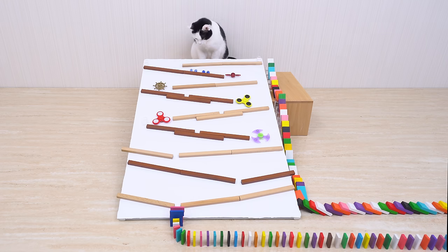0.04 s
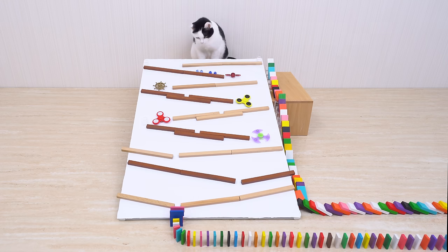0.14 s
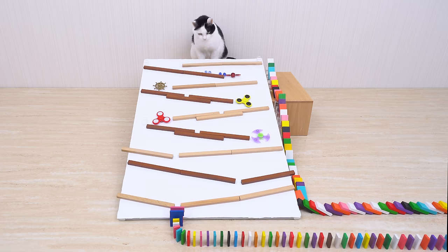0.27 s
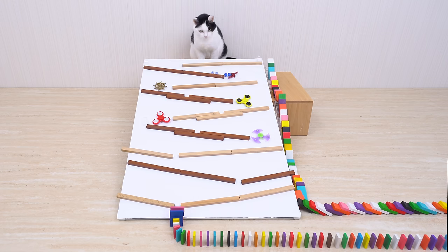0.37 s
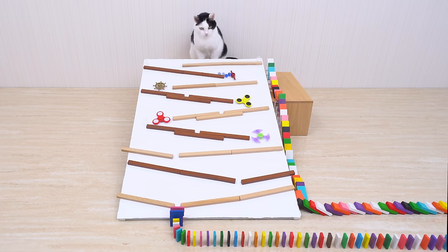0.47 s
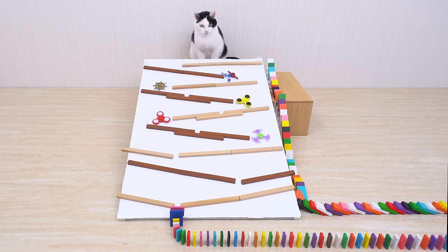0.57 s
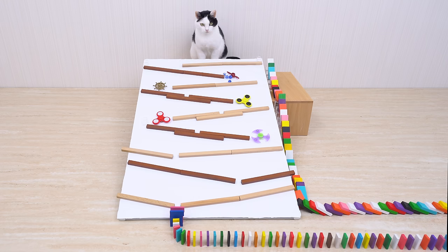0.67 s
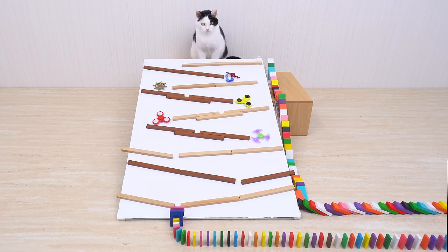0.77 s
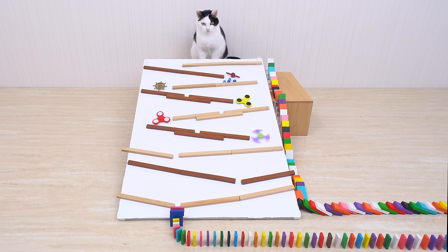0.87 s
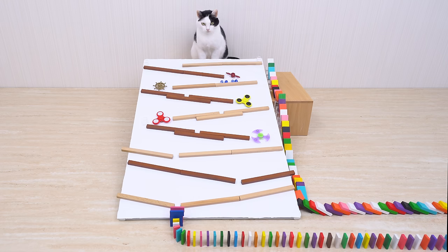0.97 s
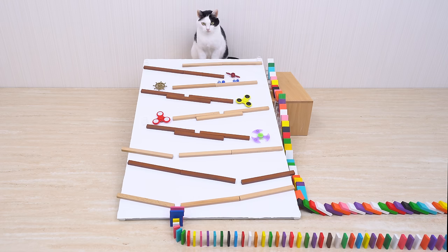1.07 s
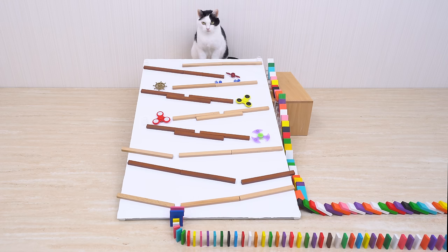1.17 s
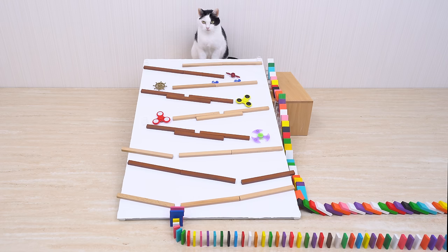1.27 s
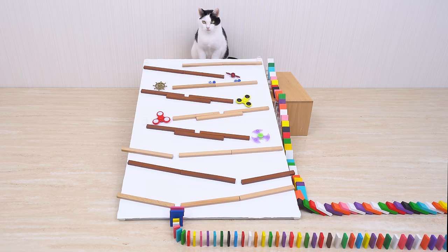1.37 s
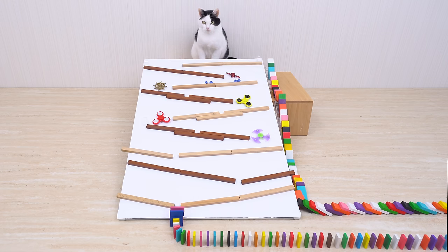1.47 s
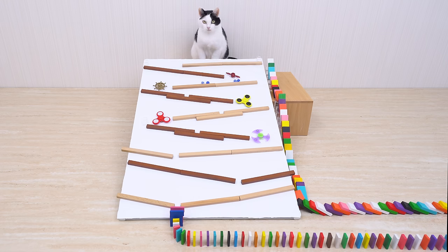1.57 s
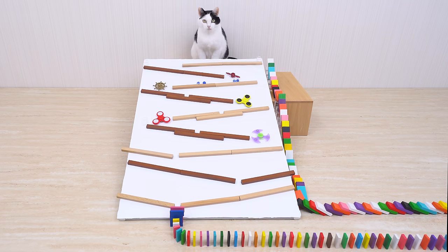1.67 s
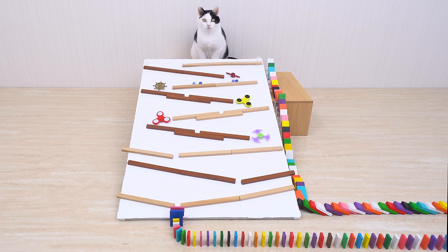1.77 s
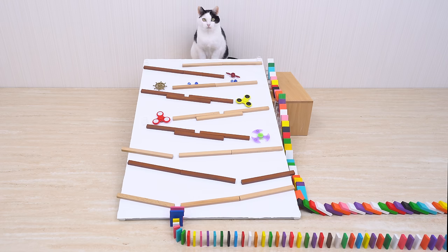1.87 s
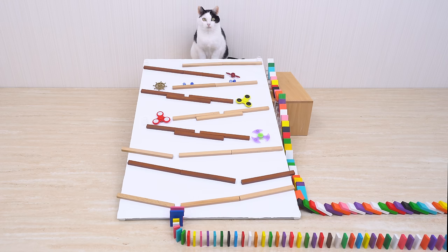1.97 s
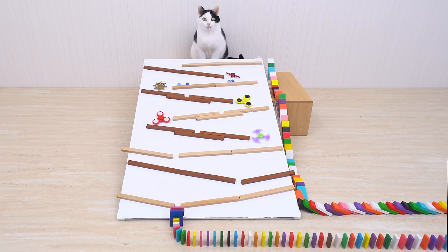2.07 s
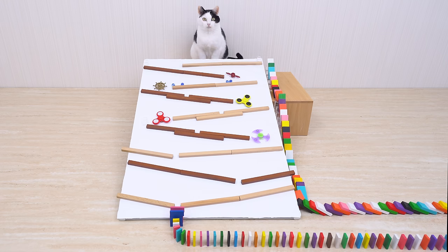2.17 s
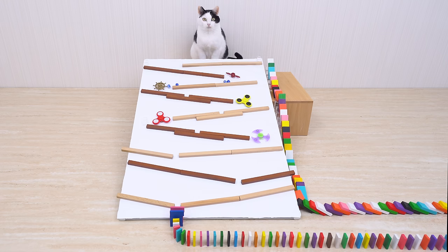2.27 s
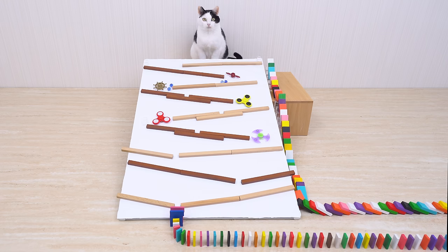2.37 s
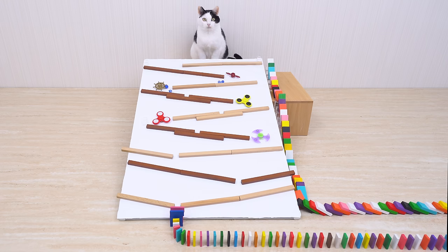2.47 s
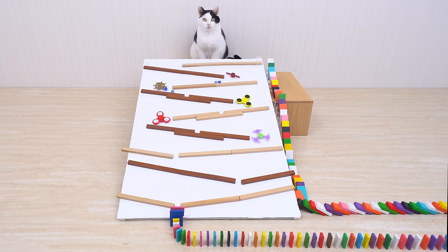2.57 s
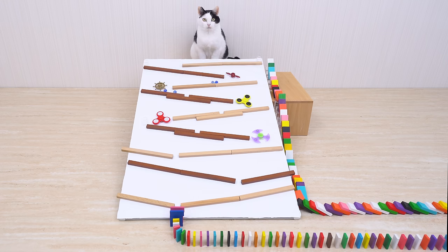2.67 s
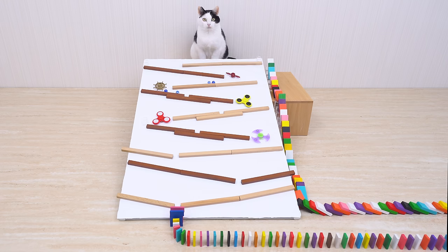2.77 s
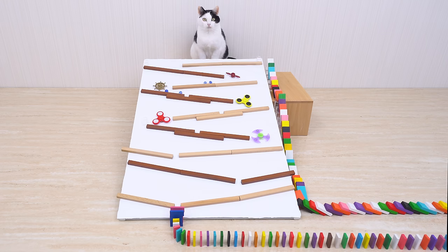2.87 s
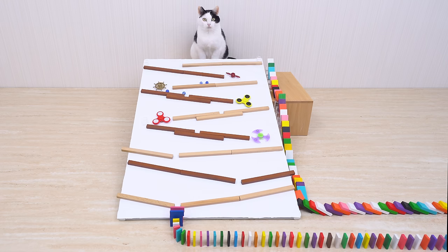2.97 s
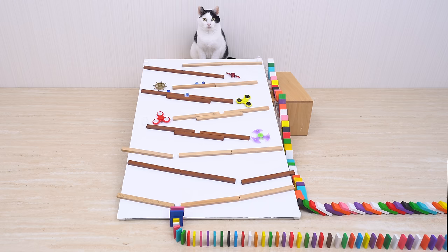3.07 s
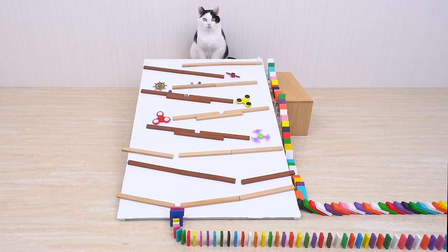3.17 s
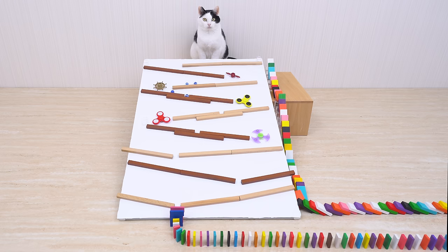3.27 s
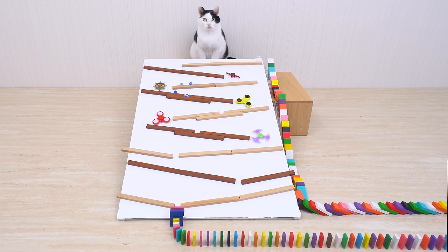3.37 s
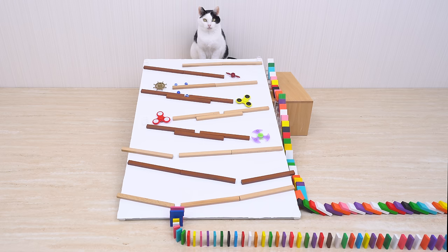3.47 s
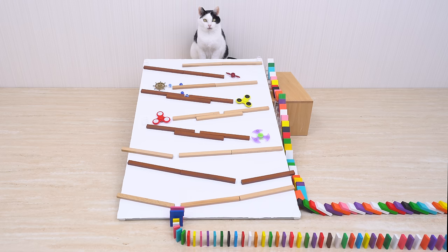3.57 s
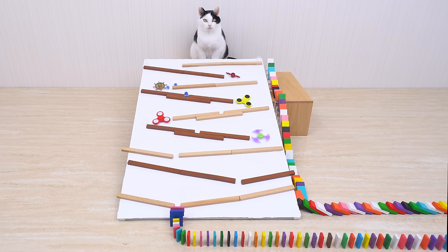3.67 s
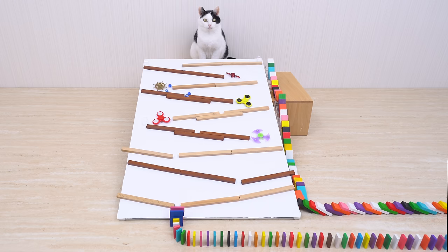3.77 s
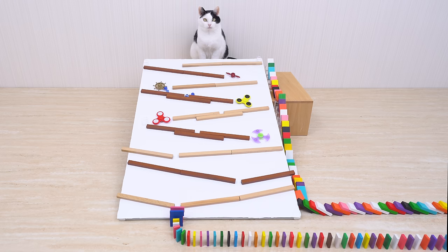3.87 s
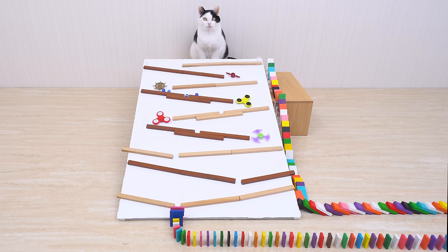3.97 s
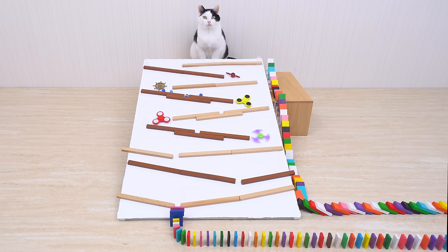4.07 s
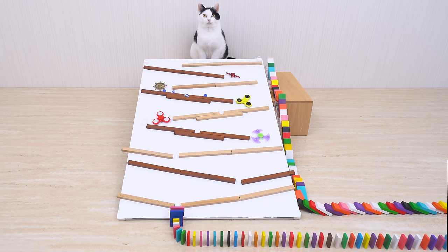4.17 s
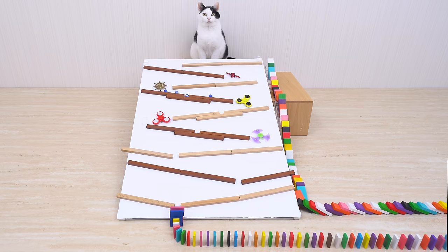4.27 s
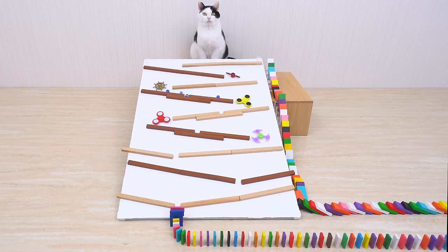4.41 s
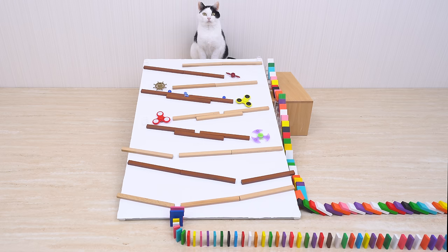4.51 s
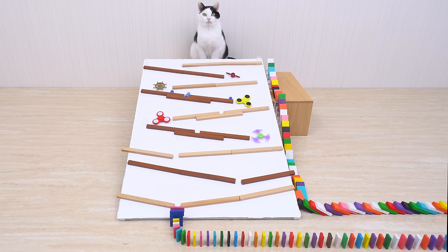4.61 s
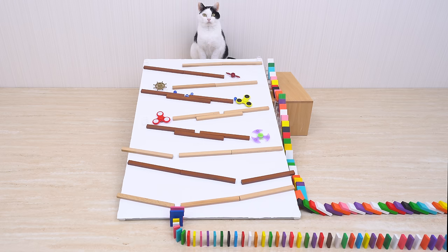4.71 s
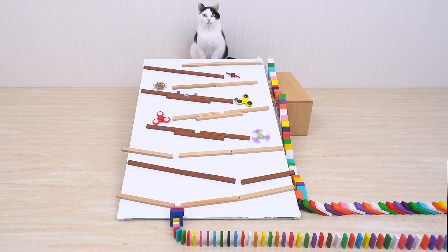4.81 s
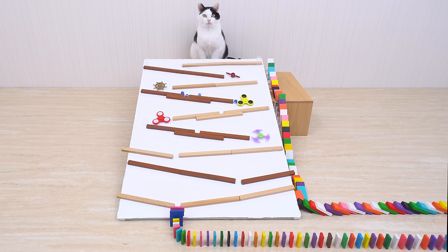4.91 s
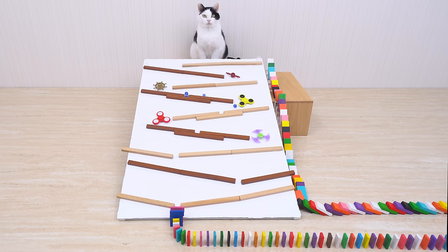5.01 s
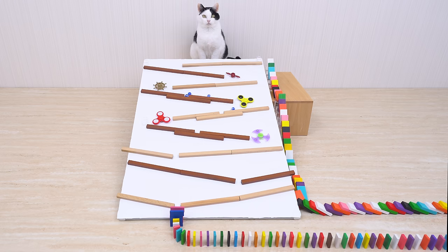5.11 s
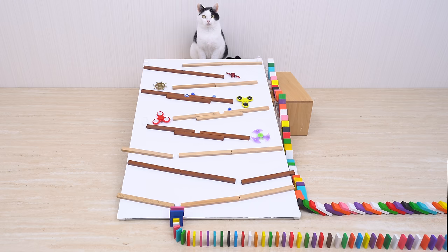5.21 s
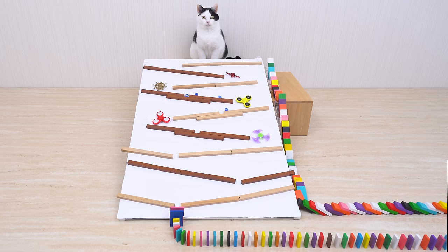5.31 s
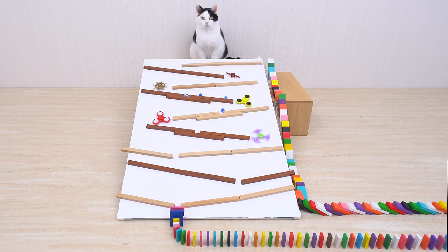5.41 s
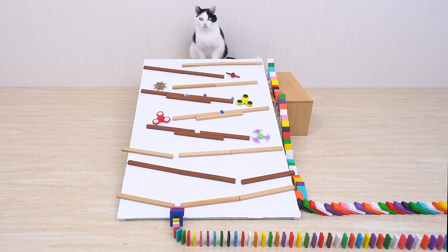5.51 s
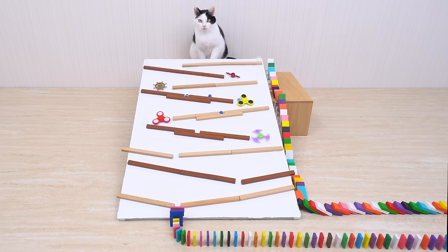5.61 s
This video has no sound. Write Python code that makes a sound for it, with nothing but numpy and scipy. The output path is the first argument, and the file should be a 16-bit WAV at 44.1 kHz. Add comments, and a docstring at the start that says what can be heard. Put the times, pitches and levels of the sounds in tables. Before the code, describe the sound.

Dry, bright marble knocks scatter over wood in uneven bursts, some with short metal spinner rings, in a quiet bare room.

```python
"""Marbles on a wooden run

Glass marbles roll along wooden rails on a sloping board, drop from rail to rail and bump two metal spinners.
Each knock is a clack of rail modes, a hard tick of filtered contact noise and a thud of board modes.
Rolling is a rain of small bumps on the board; the spinners ring as dying sines.
The microphone also hears a bare room, as a floor bounce, a wall slap and a tail, over quiet air noise."""
import sys
import numpy as np
from scipy import signal
from scipy.fft import rfft, irfft
from scipy.io import wavfile

SR = 44100
rng = np.random.default_rng(int(sys.argv[2]) if len(sys.argv) > 2 else 0)


def dump_mix(stems):
    """Bounce the given channels to the path in sys.argv[1] as a 16-bit WAV at rate SR."""
    frames = np.atleast_2d(stems).T  # one column per channel
    limited = np.clip(frames, -1, 1)  # hard clip at full scale
    pcm = np.round(limited * 32767).astype(np.int16)
    wavfile.write(sys.argv[1], SR, pcm)


def magnitude_from_level(level_db):
    """Linear magnitude for a level in decibels (20 dB per decade)."""
    exponent = np.asarray(level_db, float) / 20
    return 10 ** exponent


N = 249165

# modes of the wooden board: pitch_hz, width_hz, top_edge_push_db, lower_push_db (relative levels)
BOARD_MODES = [(261.5, 36.7, 2.5, -4.5), (294.2, 62, 5.5, -3.5), (343, 50, 3, -5), (406.4, 42, 9, 2.5),
               (445.4, 32.3, 9, -1.5), (493.8, 25, 8.5, -3.5), (571.3, 30, 10, -3), (693, 45, 1.5, -2.5),
               (808.3, 56, 4, -0.5), (993, 37, -3.5, -10), (1190, 130, 0, -10)]
LOWER_FROM_S = 1.7  # from here the marbles are on the lower rails
LOOSE_T60_S = 0.009  # decay of a loose rail's note


def evened(x):
    """Scales to rms 1."""
    return x / np.sqrt(np.mean(x ** 2) + 1e-20)


def read(hz, at_hz, value):
    """Straight lines on a log-frequency axis."""
    return np.interp(np.log(hz + 1), np.log(np.asarray(at_hz) + 1), value)


def add(mix, s, sound):
    """Mixes a sound in at time s."""
    part = mix[round(s * SR):][:len(sound)]
    part += sound[:len(part)]


def highpass(x, order, hz):
    """Butterworth filter that takes away the lows."""
    return signal.lfilter(*signal.butter(order, hz, "high", fs=SR), x)


def lowpass(x, order, hz):
    """Butterworth filter that takes away the highs."""
    return signal.lfilter(*signal.butter(order, hz, fs=SR), x)


def hiss(points):
    """Noise of rms 1 whose spectrum follows the given (Hz, relative dB) points."""
    hz = np.fft.rfftfreq(N, 1 / SR)
    spectrum = rfft(rng.standard_normal(N)) * magnitude_from_level(read(hz, *np.transpose(points)))
    return evened(irfft(spectrum, N))


def ring(hz, t60, length=.4):
    """One dying mode: a sine that falls 60 dB in t60 seconds."""
    t = np.arange(round(length * SR)) / SR
    return magnitude_from_level(-60 * t / t60) * np.sin(2 * np.pi * hz * t)


def board(low, spread=0):
    """The board's answer, peak 1, to a push high or low on it; spread is a dB change of each mode."""
    hz, width, top_db, low_db = np.transpose(BOARD_MODES)
    sign = (-1) ** np.arange(len(hz))  # neighbouring modes swing in opposite senses
    level = sign * magnitude_from_level((low_db if low else top_db) + spread)
    # a resonance of width w Hz dies by 60 dB in 2.2 / w seconds
    modes = sum(a * ring(f, 2.2 / w) for f, w, a in zip(hz, width, level))
    return modes / abs(modes).max()


def air():
    """Quiet steady air noise beneath everything, as filtered noise."""
    # spectrum of the air noise: frequency_hz, relative_level_db
    air_spectrum = [(12, -28.5), (20, -23), (146, -10.5), (244, -10), (311, -8.5), (386, -2.5), (491, -5.5),
                    (912, -12), (1440, -21), (3230, -38), (7850, -38.5), (9480, -38.5), (12400, -40),
                    (16100, -61), (22000, -120)]
    return magnitude_from_level(-68) * hiss(air_spectrum)


def room(x):
    """Single echoes, then sparse taps whose bands die at their own speed; three tails take turns."""
    # early reflections from floor and walls: delay_s, level_db
    reflections = [(.0009, -6), (.0033, -10), (0.0127, -4), (0.018, -18.5), (0.034, -12)]
    # tail of the bare room by band: frequency_hz, t60_s, relative_level_db
    tail_bands = [(205, 0.36, -8.5), (742, 0.47, 3), (2315, 0.5, 0), (4167, 0.47, 5.5), (8320, 0.38, 0.5),
                  (16000, 0.27, -0.5)]
    out = x.copy()
    dull = lowpass(x, 2, 9000)  # walls and floor scatter the treble
    for s, db in reflections:
        add(out, s, magnitude_from_level(db) * dull)
    at_hz, t60, db = np.transpose(tail_bands)
    turn = np.pi * 2.3 * np.arange(N) / SR
    for k in range(3):
        taps = np.zeros(SR)
        at = np.arange(200, SR - 20, 20)
        taps[at + rng.integers(0, 20, len(at))] = rng.choice([-1., 1.], len(at))
        hz, t, z = signal.stft(taps, SR, nperseg=128)
        rise = 1 - .8 * np.exp(-(t / .016) ** 2)  # sound needs time to come back from the walls
        band_db = read(hz, at_hz, db)[:, None]
        fall_db = 60 * t / read(hz, at_hz, t60)[:, None]
        tail = signal.istft(z * rise * magnitude_from_level(band_db - fall_db), SR, nperseg=128)[1]
        tail = tail / np.linalg.norm(tail)
        share = np.sqrt(2 / 3) * np.cos(turn + k * np.pi / 3)  # the squared shares add up to 1
        out += magnitude_from_level(-1.5) * signal.oaconvolve(share * x, tail)[:N]
    return out


def rolling():
    """Small bumps under the marbles shake the board and scratch faintly."""
    # marbles rolling along the rails: time_s, rumble_db
    rumble_levels = [(0.0, -54.5), (0.39, -65.5), (0.53, -54), (1.2, -87), (1.62, -84), (1.8, -93),
                     (1.95, -78.5), (2.2, -77), (2.34, -68.5), (2.49, -80), (2.9, -66.5), (2.98, -80),
                     (3.14, -72), (3.74, -65.5), (4.2, -106), (4.39, -80), (5.07, -81.5), (5.55, -102)]
    # grit under the glass: frequency_hz, relative_level_db
    grit_spectrum = [(880, -13.5), (1500, -0.5), (2920, -5.5), (4410, -12), (5370, -29.5), (8000, -23),
                     (10400, -51.5), (17600, -120)]
    bumps_per_s, scratch_db = 400, -15.5  # scratch is relative to the rumble
    t = np.arange(N) / SR
    level = magnitude_from_level(np.interp(t, *np.transpose(rumble_levels)))
    strength = magnitude_from_level(3 * np.minimum(rng.exponential(1, N), 3)) * rng.standard_normal(N)
    bumps = strength * (rng.random(N) < bumps_per_s / SR)
    bumps = lowpass(bumps, 1, 610)  # rolling bumps are soft and reach the high board modes less
    rumble = np.zeros(N)
    for low in (False, True):
        here = bumps * ((t > LOWER_FROM_S) == low)
        rumble += signal.oaconvolve(here, board(low))[:N]
    return level * (evened(rumble) + magnitude_from_level(scratch_db) * hiss(grit_spectrum))


def lurches():
    """A marble lurches over a rough spot: a soft push that favours the low board modes."""
    # soft pushes on the board: start_s, peak_db
    soft_pushes = [(0.004, -55.5), (0.128, -69), (0.286, -46), (0.408, -48), (1.994, -49.5), (2.024, -51),
                   (2.109, -53), (2.173, -52), (2.277, -53), (2.329, -59), (2.79, -44.5), (3.463, -45.5),
                   (3.486, -59.5), (3.597, -51), (3.651, -55), (4.966, -53)]
    out, t = np.zeros(N), np.arange(400) / SR
    push = t * np.exp(-t / .0003)  # strongest after 0.3 ms
    for s, db in soft_pushes:
        hum = np.convolve(board(s > LOWER_FROM_S), push)
        add(out, s, magnitude_from_level(db) * hum / abs(hum).max())
    return out


def spinner(modes, strikes):
    """Each strike excites the three families of metal modes by its own amounts."""
    out = np.zeros(N)
    for s, *family_db in strikes:
        bell = sum(magnitude_from_level(family_db[int(family)] + db) * ring(hz, t60) for hz, t60, family, db in modes)
        t = np.arange(len(bell)) / SR
        swell = 1 - np.exp(-t / .004)  # the arms take up the blow over a few ms
        add(out, s, bell * swell)
    return out


def spinners():
    """Two small metal spinners, one high and one low on the board, ring when marbles bump them."""
    # modes of each spinner: pitch_hz, t60_s, family (0-2), level_in_family_db
    upper_modes = [(4231, .08, 0, 0), (7905, .1, 1, 0), (8158, .13, 1, -3), (15110, .07, 2, 0),
                   (15520, .12, 2, -6)]
    lower_modes = [(8480, .09, 0, 0), (11080, .05, 1, 0), (14930, .05, 2, 0)]
    # strikes on each spinner: start_s, family_0_db, family_1_db, family_2_db
    upper_hits = [(0.3378, -73.5, -48.5, -36), (0.36, -49.5, -42.5, -55), (0.4254, -67, -40.5, -62),
                  (0.4499, -52, -44, -38.5), (0.5616, -57.5, -38, -51), (0.5931, -56, -28, -64.5)]
    lower_hits = [(2.3373, -60, -38, -38), (2.5274, -62, -60, -39), (2.5651, -52, -80, -59),
                  (3.685, -79, -75, -57), (3.9226, -46, -43, -72), (4.0659, -53, -59, -72),
                  (4.0817, -86, -51, -46)]
    return spinner(upper_modes, upper_hits) + spinner(lower_modes, lower_hits)


def pings():
    """Short ringing notes, each one dying sine, most sounding together with a knock."""
    # short ringing notes: start_s, level_db, pitch_hz
    short_notes = [(0.3383, -40.5, 4140), (0.55, -41.5, 5750), (0.586, -38, 980), (0.5945, -40, 6460),
                   (1.2789, -51, 990), (1.4036, -62.5, 1040), (2.6692, -51, 1000)]
    out = np.zeros(N)
    for s, db, hz in short_notes:
        add(out, s, -magnitude_from_level(db) * ring(hz, LOOSE_T60_S, .03))
    return out


def rail_clack(modes, lower, variation, loose_hz):
    """Short rail modes and a loose rail's note; random numbers vary each mode's pitch and level."""
    wood = 0
    for (f, t60, *db), v in zip(modes, variation):
        wood = wood + magnitude_from_level(db[lower] + 2 * v) * ring(f * (1 + v / 40), t60, .03)
    wood = highpass(wood, 2, 1610) / 3  # takes away the lows of the clack
    clack = wood + magnitude_from_level(-6) * ring(loose_hz, LOOSE_T60_S, .03)
    # glass presses into wood for a moment
    contact = np.exp(-(np.arange(32) / SR / .00006 - 3) ** 2)
    return np.convolve(clack, contact / contact.sum())


def glass_tick(grain):
    """One sharp contact of the glass, then a trace of chatter, kept to the treble."""
    t = np.arange(len(grain)) / SR
    tick = highpass((t == 0) + .3 * grain * np.exp(-t / .0007), 3, 6800)
    return lowpass(tick, 1, 11140)


def knocks():
    """Clack of the rail, tick of the glass and thud of the board for each knock."""
    # marble knocks: start_s, clack_db, loose_rail_pitch_hz, board_thud_db, glass_tick_db
    marble_knocks = [(0.0715, -44, 2920, -79, -57), (0.169, -60.5, 2800, -78.5, -73),
                     (0.219, -56, 3300, -81.5, -66), (0.281, -74.5, 5000, -76, -54),
                     (0.3387, -57.5, 4170, -48.5, -21.5), (0.3844, -54, 4330, -53, -25),
                     (0.4031, -47, 4230, -47.5, -27), (0.45, -40, 4000, -47.5, -17),
                     (0.5434, -53, 5900, -54, -13), (0.551, -62, 5750, -53, -21),
                     (0.5941, -33, 6280, -42, -10), (0.6616, -38.5, 5900, -53, -34),
                     (0.6882, -21, 3640, -34, -19), (0.824, -27.5, 3220, -32.5, -10),
                     (0.8751, -35, 3350, -43.5, -23.5), (0.91, -27, 3520, -34.5, -22),
                     (0.9506, -26, 5830, -52, -15.5), (0.9534, -28, 3400, -36, -21),
                     (1.024, -24.5, 3410, -36, -23), (1.2797, -44, 990, -58, -65),
                     (1.3465, -57, 1055, -68.5, -58), (1.4035, -43, 1047, -56, -65),
                     (1.947, -57.5, 4233, -66, -60), (2.339, -52, 2200, -89, -29.5),
                     (2.5136, -28.5, 4300, -38, -18.5), (2.5248, -40, 3560, -72, -39),
                     (2.5651, -38.5, 950, -66, -27.5), (2.6701, -43.5, 1020, -75, -43),
                     (2.7178, -27, 2290, -39.5, -28.5), (3.1624, -37, 2507, -44.5, -51),
                     (3.2317, -31.5, 2460, -40, -56), (3.6843, -46, 2250, -71, -31),
                     (3.7525, -34, 2220, -45.5, -21), (3.8498, -30, 3580, -39.5, -25.5),
                     (3.9166, -51, 4260, -46.5, -54), (3.9271, -46, 3030, -74, -19),
                     (4.0048, -53, 3992, -51.5, -31), (4.029, -30, 2460, -40, -26.5),
                     (4.069, -37, 1080, -44, -40), (4.0808, -36.5, 2200, -74, -24.5),
                     (4.607, -34.5, 2190, -43.5, -24.5), (4.7167, -46.5, 900, -47, -71),
                     (4.7594, -37.5, 1220, -40.5, -17), (4.913, -58, 1206, -66, -40),
                     (5.081, -41, 2130, -47, -76), (5.1426, -21.5, 2420, -37.5, -23),
                     (5.3411, -54, 2830, -71, -41), (5.5153, -75, 1300, -81, -49),
                     (5.5601, -38.5, 4170, -47, -37.5), (5.6352, -29, 4430, -43.5, -28)]
    # rail modes: pitch_hz, t60_s, upper_rails_db, lower_rails_db (relative levels)
    rail_modes = [(2000, 0.0019, -15.5, -6.5), (2762, 0.00459, -1.5, 6.5), (3400, 0.0047, 1.5, 0.5),
                  (4257, 0.0035, 3.5, 6.5), (4900, 0.0029, 2.5, 5.5), (6560, 0.0012, 11, 5.5),
                  (7320, 0.0021, 5, -3), (8460, 0.0026, -11, 20)]
    out = np.zeros(N)
    for s, clack_db, hz, thud_db, tick_db in marble_knocks:
        grain = rng.standard_normal(256)
        spread = rng.standard_normal(len(BOARD_MODES))  # a random dB change of each board mode
        variation = np.clip(rng.standard_normal(len(rail_modes)), -1.5, 1.5)
        lower = s > LOWER_FROM_S
        add(out, s, -magnitude_from_level(clack_db) * rail_clack(rail_modes, int(lower), variation, hz))
        add(out, s, magnitude_from_level(tick_db) * glass_tick(grain))
        add(out, s, magnitude_from_level(thud_db) * board(lower, spread))
    return out


def scene():
    """All sources share the room; quiet air noise lies beneath."""
    near = rolling() + lurches() + spinners() + pings() + knocks()
    # the small board radiates no deep bass
    near = signal.sosfilt(signal.butter(3, 200, "high", fs=SR, output="sos"), near)
    return (room(near) + air())[None]


def roll_off(x):
    """The treble ends steeply here."""
    return signal.sosfilt(signal.butter(12, 17060, fs=SR, output="sos"), x)


def record(dry):
    """A steep lowpass at 16.3 kHz ends the treble of the finished mix."""
    edge = signal.firwin(255, 16300, window=("kaiser", 8), fs=SR)
    mix = signal.oaconvolve(dry, edge[None], "same")
    return roll_off(mix)


dry = scene()
out = record(dry)
dump_mix(out)
```